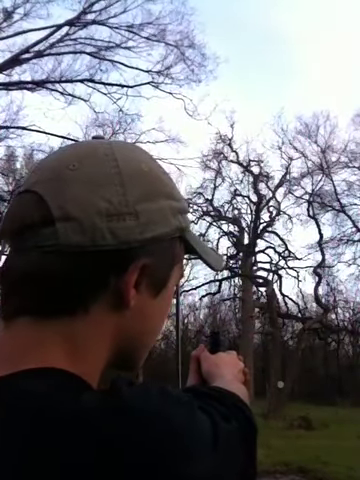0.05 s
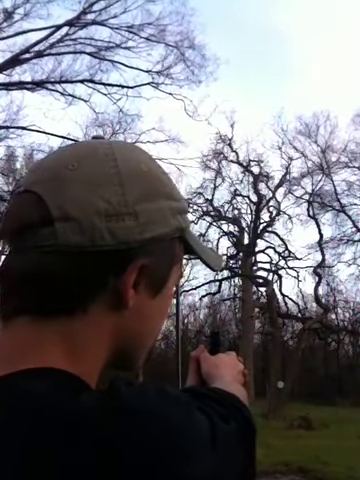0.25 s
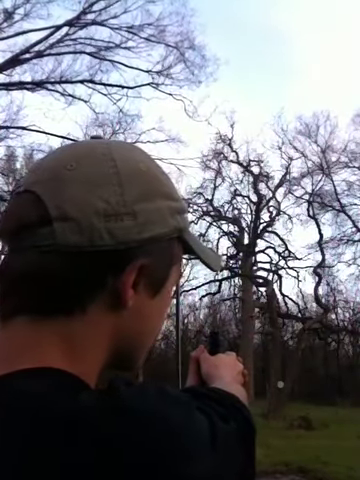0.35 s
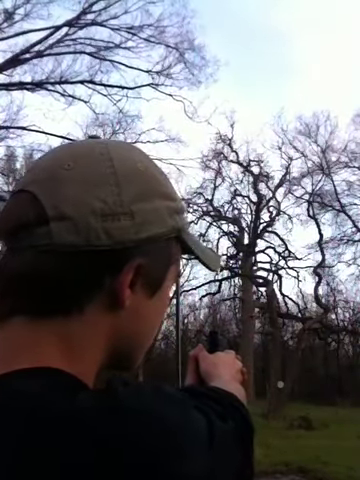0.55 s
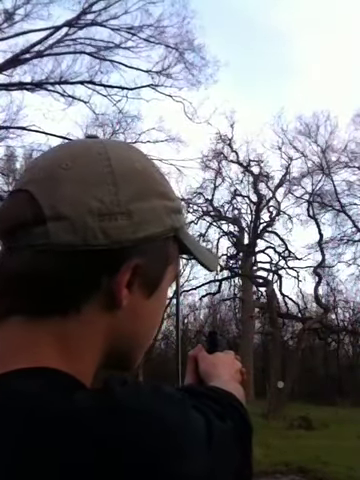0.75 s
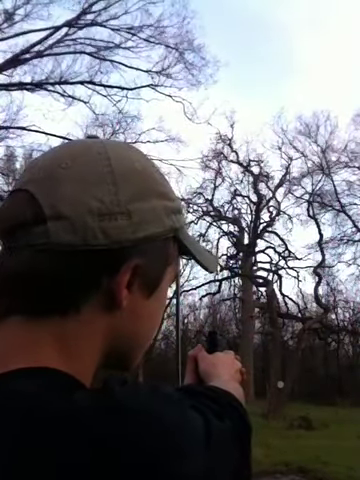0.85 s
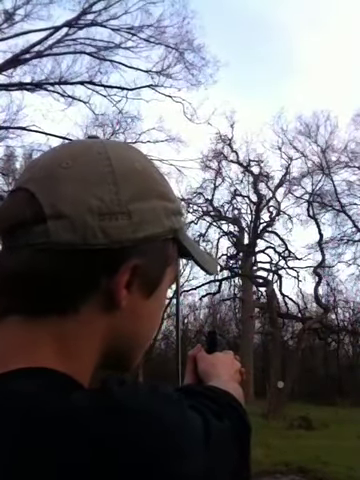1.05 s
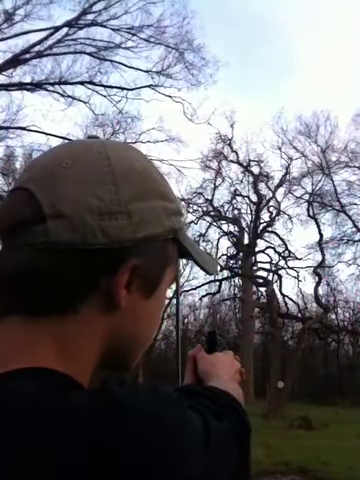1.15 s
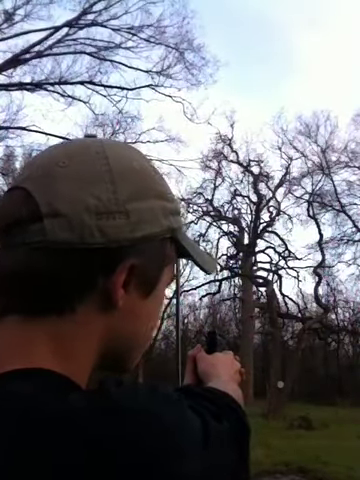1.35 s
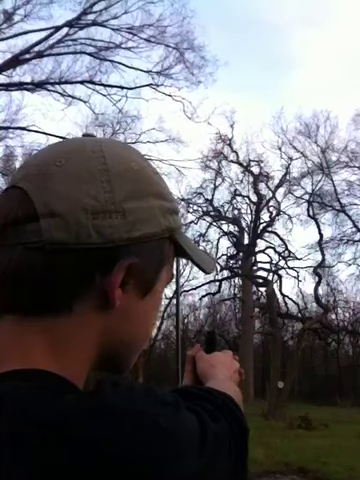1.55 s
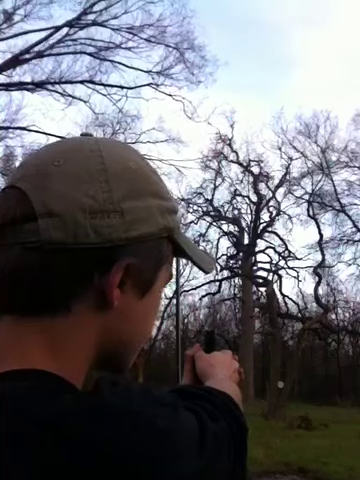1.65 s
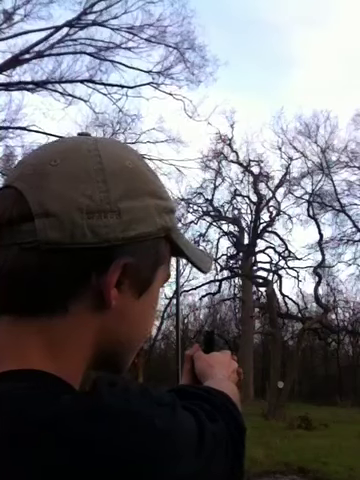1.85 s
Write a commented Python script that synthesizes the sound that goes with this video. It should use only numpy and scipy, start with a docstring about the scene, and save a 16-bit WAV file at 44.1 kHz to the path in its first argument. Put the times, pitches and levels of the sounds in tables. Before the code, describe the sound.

Trigger ticks, a sharp gas pistol pop and a quick pellet smack, then another tick and a second pop, followed by soft wind buffets and final clicks; close, bright sound in quiet open woodland.

```python
"""A gas pistol fires twice in open woodland, just ahead of a small camera. Each shot is a train of blows that
ring damped modes (hammer tap, valve crack, muzzle pop, ground bounce) over a burst of gas noise. Trunks
return filtered echoes and the trees a hissing tail of decaying noise. Trigger ticks and a pellet strike are
short noise bursts, the strike with ringing modes; a thin hiss, gusts of low noise with single buffets and
steady outdoor noise lie behind."""
import sys
import numpy as np
from scipy import signal
from scipy.io import wavfile
from scipy.ndimage import uniform_filter1d

SR = 44100
rng = np.random.default_rng(int(sys.argv[2]) if len(sys.argv) > 2 else 0)


def unload_audio(sound):
    """Save the sound as a 16-bit wav file, at the path given as the first command line argument."""
    columns = np.transpose(np.atleast_2d(sound))
    # keep every value between -1 and 1, then stretch to whole-number steps
    steps = np.round(np.clip(columns, -1, 1) * 32767)
    wavfile.write(sys.argv[1], SR, steps.astype(np.int16))


N = 83790  # length of the scene in samples

# All spectra list (frequency [Hz], relative density [dB per Hz]); noise() scales them to unit RMS.
# All mode tables list (frequency [Hz], relative level [dB], decay time t60 [s]).

# outdoor background: spectrum
AIR_SPECTRUM = [(15, -63.5), (25, -34.5), (161, -7), (206, -14.5), (263, -0.5), (285, -11.5), (335, -39),
                (373, -22), (531, -17), (677, -16), (754, -27), (1790, -29), (1940, -31), (2410, -31),
                (2840, -32), (5570, -36.5), (7920, -39), (8830, -44), (16000, -48.5)]
AIR_DB, AIR_PATCH_DB = -63, 0.8

# faint high hiss while the trigger is held: (start [s], end [s], level [dB]); and its spectrum
HISS_SPANS = [(1.05, 1.244, -82), (1.76, 1.874, -75.5)]
HISS_SPECTRUM = [(3000, -31), (5000, -3), (7500, -4), (8500, -8), (9500, -19.5), (16000, -50)]

# wind on the microphone: spectrum
GUST_SPECTRUM = [(15, -66.5), (25, -40), (48, -20.5), (118, 1.5), (144, 1), (251, -5.5), (289, -1),
                 (332, -26.5), (400, -35), (520, -56), (880, -120)]
# course of the gusts: (time [s], level [dB])
GUST_LEVELS = [(.9, -77), (1.2, -66), (1.361, -57.5), (1.45, -52), (1.6, -56.5), (1.7, -60.5), (1.9, -70)]
# single buffets of wind: (centre time [s], frequency [Hz], peak level [dB], length [s])
WIND_BUFFETS = [(1.0, 113, -53.5, 0.032), (1.4, 205, -46.5, .035), (1.447, 166, -44, 0.028),
                (1.518, 150, -46, 0.0528), (1.555, 149.2, -49, 0.036), (1.617, 122, -49, 0.019),
                (1.68, 160, -61, 0.034), (1.715, 130, -54.5, 0.046), (1.805, 115, -46, 0.032)]
GUST_PATCH_DB = 0.5

# trigger ticks: (time [s], peak level [dB], decay time t60 [s], tilt [dB per octave]); and their spectrum
TRIGGER_TICKS = [(.0012, -42.5, 0.027, 5.8), (.0068, -40.5, 0.025, -1), (1.0449, -37.5, 0.03, 3.8),
                 (1.049, -59, 0.016, 5.3), (1.774, -45.5, 0.0067, 1.2), (1.88, -53, 0.012, 2),
                 (1.8906, -41.5, .025, 4.5), (1.896, -38, 0.015, 2)]
TICK_SPECTRUM = [(290, -51), (500, 3), (698, -4.5), (1770, 6.5), (3060, -1.5), (3700, 2), (4340, -16),
                 (4870, -15.5), (5470, 1), (6610, -1.5), (7860, -7), (10800, -15.5), (16000, -44.5)]
# pellet strike and its echoes:
# (time [s], peak level [dB], decay time t60 [s], tilt [dB per octave], thinned below [Hz]); and their spectrum
PELLET_STRIKES = [(.433, -25, 0.022, -.6, 500), (0.454, -39.5, 0.14, 0.5, 900),
                  (0.5534, -37.5, 0.017, -8, 1500)]
STRIKE_SPECTRUM = [(240, -40.5), (400, -47), (626, 3), (865, -10), (1460, -2.5), (2250, 0), (3070, 3.5),
                   (3370, 1), (4800, -1), (6950, 6), (8500, -1.5), (11900, -12), (16000, -36)]
# what the pellet strikes: modes
TARGET_MODES = [(1910, -23, 0.056), (2300, -20.5, 0.024), (3480, -13, .05), (3800, -17, 0.027),
                (6400, -38.5, 0.052)]
CLICK_RISE_S = 0.0003
TAIL_DB, TAIL_T60_S = -28, 0.9  # scatter after ticks and strikes, relative to the start of the burst

# the shots: onset time [s]
SHOT_TIMES = [.2251, 1.26905]
# blows inside one shot, levels before a common halving of amplitude:
# (delay [s], thump level [dB], knock level [dB], crack level [dB], sizzle level [dB])
SHOT_BLOWS = [(-.0031, -27, -23, -19.5, -28), (0., -2, -7, -8, -31.5), (.0012, -12, -7.5, -11.5, -4),
              (.0022, -9, -6, -20, -17), (.0063, -2.5, -8.5, -6.5, -15), (.0103, -10.5, -17, -20.5, -25.5),
              (.0162, -27.5, -23, -18.5, -26.5)]
# pistol and muzzle: modes in four groups of rising pitch
THUMP_MODES = [(457, -17.5, 0.021), (638, -8, 0.036), (1210, -21.5, 0.06), (944, -20, 0.025)]
KNOCK_MODES = [(1620, 1, 0.0068), (2170, -11, .01), (2615, -3.5, .01), (3190, -3.5, 0.0029),
               (3700, 0.5, 0.0064)]
CRACK_MODES = [(5510, -15, 0.014), (5700, -2.5, 0.015), (6500, 11.5, 0.0036), (7300, -1.5, 0.007),
               (7700, -13.5, .008)]
SIZZLE_MODES = [(9900, 1.5, 0.0021), (10695, -2, .005), (11700, -12.5, 0.012), (14400, -15, .004)]
RISE_CYCLES = 0.37  # time constant of a mode's swell, in its own cycles
# low push of the muzzle pop: modes
PUSH_MODES = [(162, -27, .07), (215, -12.5, 0.029), (292, -24, 0.084)]
PUSH_DELAY_S = 0.00033
# escaping gas and rattle, starting with the hammer tap: spectrum
GAS_SPECTRUM = [(470, -40.5), (800, -12), (1260, -15.5), (1760, -1), (2410, -13), (2570, -11),
                (3100, -12.5), (3650, 0.5), (4400, -15), (5440, -1.5), (6650, -1), (8550, -5.5),
                (9940, -16.5), (13100, -23), (16000, -37)]
GAS_DB, GAS_T60_S, GAS_START_S, GAS_RISE_S = -23, 0.1, -0.0031, 0.0013
# single echoes from the nearest trunks: (delay [s], level [dB])
TRUNK_ECHOES = [(.0495, -25), (0.0606, -34), (.075, -48.5)]
TRUNK_LOW_HZ = 1300  # thin trunks let the bass pass by
TRUNK_TOP_HZ, TRUNK_SMEAR_S = 7000, 0.0005  # bark dulls and smears each echo
# scatter from the trees: spectrum
WOODS_SPECTRUM = [(240, -41.5), (400, -13.5), (545, -8.5), (598, 6), (676, -10.5), (742, -6), (814, -25.5),
                  (935, -6.5), (1040, -8), (1130, 2), (1230, -16), (1330, -8), (1600, -10.5), (1730, 0),
                  (2050, -15), (3310, -11.5), (4310, -11.5), (6640, -6), (7170, -13), (9180, -12),
                  (10900, -22), (13100, -20.5), (16000, -47)]
# its decay: (frequency [Hz], decay time t60 [s])
WOODS_DECAY = [(300, 0.25), (700, 0.86), (1500, 1.0), (3000, 0.9), (6000, 0.81), (10000, .55),
               (15000, 0.36)]
WOODS_DB, WOODS_RISE_S, WOODS_PATCH_DB = -43.5, 0.04, 1.5
SHORT_DB, SHORT_RISE_S = -47, 0.004
SHORT_SHARE = 0.16  # decay time of the short burst as a share of the long part's
BURST_DELAY_S = 0.046  # delay of the short burst of scatter

MIC_LOW_HZ, MIC_TOP_HZ, EDGE_HZ = 116, 14000, 16450


def amp(db):
    """Level and amplitude: 20 dB is a factor of ten in pressure."""
    return 10 ** (np.asarray(db) / 20)


def evened(x):
    """Normalisation to unit root-mean-square."""
    return x / np.sqrt(np.mean(x ** 2) + 1e-20)


def read(points, hz):
    """Interpolation along a logarithmic frequency axis."""
    f, value = np.transpose(points)
    return np.interp(np.log(hz + 1), np.log(f + 1), value)


def add(mix, s, sound):
    """Superposition: pressures add, here from time s onward and cut at the end of the mix."""
    part = mix[max(round(s * SR), 0):][:len(sound)]
    part += sound[:len(part)]


def noise(spectrum, count, size, patch_db=0, shape_db=None):
    """Spectral synthesis: random short-time spectra in drifting patches, unit RMS before shape_db(hz, s)."""
    hop = size // 4
    frames = count // hop + 5
    hz = np.fft.rfftfreq(size, 1 / SR)[:, None]
    real, imag, patches = rng.standard_normal((frames, len(hz), 3)).T
    patches = uniform_filter1d(patches, size=5, axis=0)  # across frequency
    patches = evened(uniform_filter1d(patches, size=8, axis=1))  # across time
    z = (real + 1j * imag) * amp(read(spectrum, hz) + patch_db * patches)
    scale = np.std(signal.istft(z, nperseg=size, noverlap=size - hop)[1])
    if shape_db:
        z = z * amp(shape_db(hz, np.arange(frames) * hop / SR))
    return signal.istft(z, nperseg=size, noverlap=size - hop)[1][:count] / scale


def ring(modes, sign=-1):
    """Modal superposition: damped sines after one blow, each mode multiplied by sign once more than the last."""
    t = np.arange(4000) / SR
    out = np.zeros(len(t))
    for k, (hz, db, t60) in enumerate(modes):
        decay = amp(db - 60 * t / t60)
        swell = (1 - np.exp(-t * hz / RISE_CYCLES)) ** 2
        out += sign ** k * decay * swell * np.sin(2 * np.pi * hz * t)
    return out


def outdoor_air():
    """Stationary random noise: a fixed mean spectrum with slight drifting patches."""
    return amp(AIR_DB) * noise(AIR_SPECTRUM, count=N, size=1024, patch_db=AIR_PATCH_DB)


def trigger_hiss():
    """Amplitude-windowed noise: thin treble that fades in and out."""
    out = np.zeros(N)
    for start, end, db in HISS_SPANS:
        count = round((end - start) * SR)
        fade = signal.windows.tukey(count, .3)
        add(out, start, amp(db) * fade * noise(HISS_SPECTRUM, count=count, size=256))
    return out


def wind():
    """Turbulent pressure on the microphone: low noise modulated by the gusts, plus windowed sine buffets."""
    s, db = np.transpose(GUST_LEVELS)
    level = amp(np.interp(np.arange(N) / SR, s, db, left=-90))
    spectrum = GUST_SPECTRUM + [(600, -62.5), (20000, -89.5)]  # faint floor above the rumble
    out = level * noise(spectrum, count=N, size=2048, patch_db=GUST_PATCH_DB)
    for centre, hz, db, length in WIND_BUFFETS:
        t = np.arange(0, length, 1 / SR)
        wave = np.sin(2 * np.pi * (hz * t + rng.random()))  # random starting phase
        add(out, centre - length / 2, amp(db) * np.hanning(len(t)) * wave)
    return out


def clicks(rows, spectrum):
    """Impulsive excitation: abrupt, decaying noise bursts, each with a faint scattered tail."""
    out, t = np.zeros(N), np.arange(SR // 2) / SR
    for start, db, t60, tilt_db, *low_hz in rows:
        def colour_db(hz, s):
            tilt = tilt_db * np.log2((hz + 50) / 4000)
            thinning = 20 * np.log10(1 + (sum(low_hz) / (hz + 1)) ** 4)  # none without low_hz
            return tilt - thinning

        burst = noise(spectrum, count=len(t), size=256, shape_db=colour_db)
        fall = amp(-60 * t / t60) * np.minimum(t / CLICK_RISE_S, 1)
        tail = amp(TAIL_DB - 60 * t / TAIL_T60_S)
        peak = abs(burst * fall).max()
        add(out, start, amp(db) * burst * (fall + tail) / peak)
    return out


def pellet_strike():
    """Impact and resonance: noise bursts, the first also ringing the modes of the target."""
    out = clicks(PELLET_STRIKES, STRIKE_SPECTRUM)
    start, db = PELLET_STRIKES[0][:2]
    add(out, start, amp(db) * ring(TARGET_MODES))
    return out


def escaping_gas():
    """Jet noise: a quick rise, then exponential decay."""
    t = np.arange(SR) / SR
    level = amp(GAS_DB - 60 * t / GAS_T60_S) * np.minimum(t / GAS_RISE_S, 1)
    return level * noise(GAS_SPECTRUM, count=SR, size=256)


def trunk_echoes(direct):
    """Discrete reflection: delayed band-passed copies, smeared by short decaying random responses."""
    band = signal.butter(N=2, Wn=[TRUNK_LOW_HZ, TRUNK_TOP_HZ], btype="band", fs=SR, output="sos")
    dull = signal.sosfilt(band, direct)
    out = np.zeros(SR)
    for delay, db in TRUNK_ECHOES:
        smear = rng.standard_normal(200) * np.exp(-np.arange(200) / (SR * TRUNK_SMEAR_S))
        add(out, delay, amp(db) * signal.oaconvolve(dull, smear / np.linalg.norm(smear)))
    return out


def woodland_scatter():
    """Diffuse reverberation: a long, slowly decaying noise from the onset and a short, delayed burst."""
    def long_db(hz, s):
        return WOODS_DB - 60 * s / read(WOODS_DECAY, hz)

    def short_db(hz, s):
        return SHORT_DB - 60 * s / (SHORT_SHARE * read(WOODS_DECAY, hz))

    t = np.arange(SR) / SR
    long_part = noise(WOODS_SPECTRUM, count=SR, size=512, patch_db=WOODS_PATCH_DB, shape_db=long_db)
    short_burst = noise(WOODS_SPECTRUM, count=SR, size=256, patch_db=WOODS_PATCH_DB, shape_db=short_db)
    out = long_part * np.minimum(t / WOODS_RISE_S, 1)
    add(out, BURST_DELAY_S, short_burst * np.minimum(t / SHORT_RISE_S, 1))
    return out


def shot():
    """Impulse response: blows excite modes over a gas jet, then trunks echo and the trees reverberate."""
    lead, out = 0.006, np.zeros(SR)  # lead [s] leaves room for what precedes the nominal onset
    # a sign of 0.93 weakens each crack mode a little more than the one before
    groups = [ring(THUMP_MODES), ring(KNOCK_MODES), ring(CRACK_MODES, sign=0.93), ring(SIZZLE_MODES)]
    for delay, *dbs in SHOT_BLOWS:
        blow = sum(amp(db) * group for db, group in zip(dbs, groups)) / 2
        add(out, lead + delay, blow)
    add(out, lead + GAS_START_S, escaping_gas())
    echoes = trunk_echoes(out)  # of blows and gas only
    add(out, lead + PUSH_DELAY_S, ring(PUSH_MODES, sign=1))
    add(out, 0, echoes)
    add(out, lead, woodland_scatter())
    return lead, out


def scene():
    """Linear superposition of the background, the small sounds and both shots."""
    mix = outdoor_air() + trigger_hiss() + wind()
    mix = mix + clicks(TRIGGER_TICKS, TICK_SPECTRUM) + pellet_strike()
    for s in SHOT_TIMES:
        lead, sound = shot()
        add(mix, s - lead, sound)
    return mix[None]


def record(dry):
    """Linear filtering: microphone roll-off at both ends, then the band limit of the camera."""
    low_cut = signal.butter(N=2, Wn=MIC_LOW_HZ, btype="high", fs=SR, output="sos")
    top_cut = signal.butter(N=2, Wn=MIC_TOP_HZ, fs=SR, output="sos")
    x = signal.sosfilt(top_cut, signal.sosfilt(low_cut, dry))
    band_limit = signal.firwin(511, EDGE_HZ, window=("kaiser", 9), fs=SR)
    return signal.oaconvolve(x, band_limit[None], "same")


dry = scene()
out = record(dry)
unload_audio(out)
```